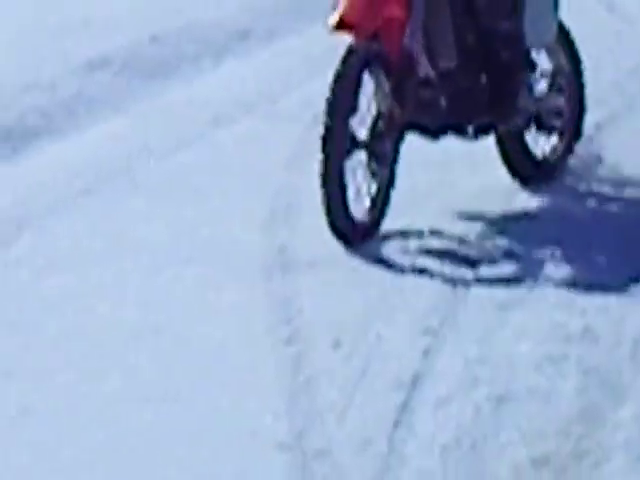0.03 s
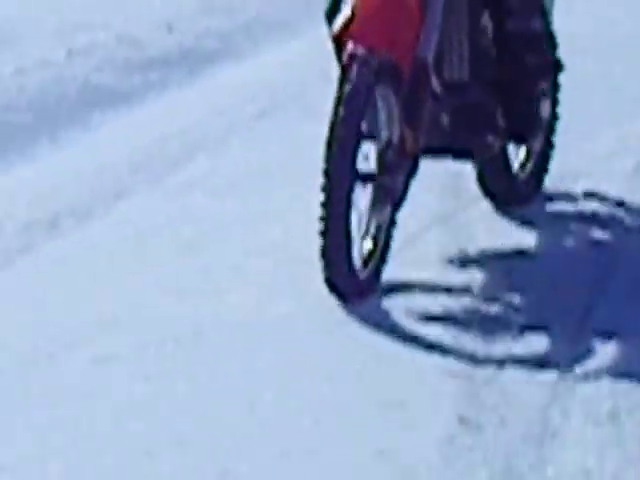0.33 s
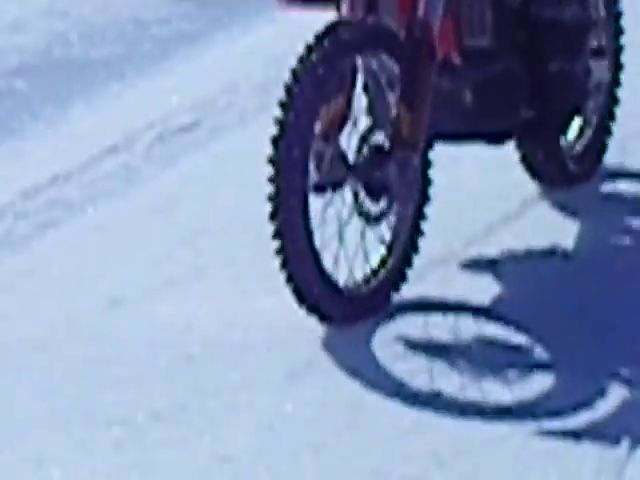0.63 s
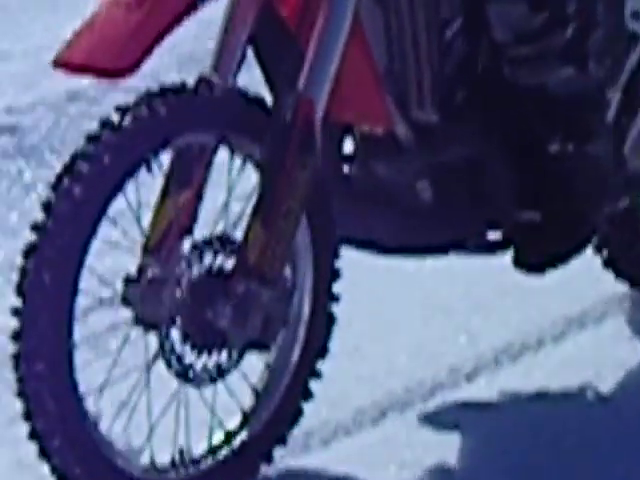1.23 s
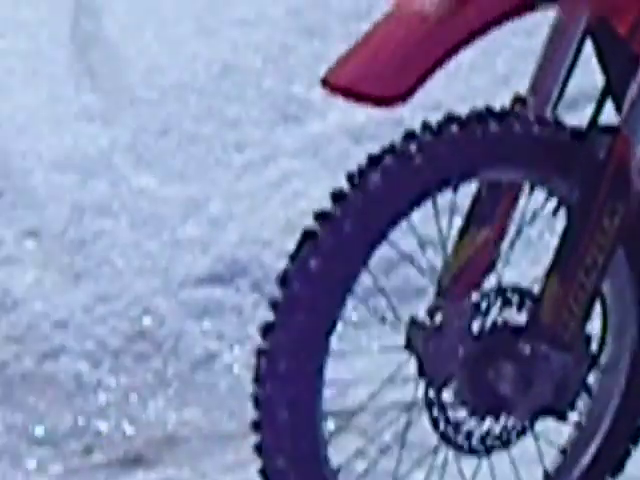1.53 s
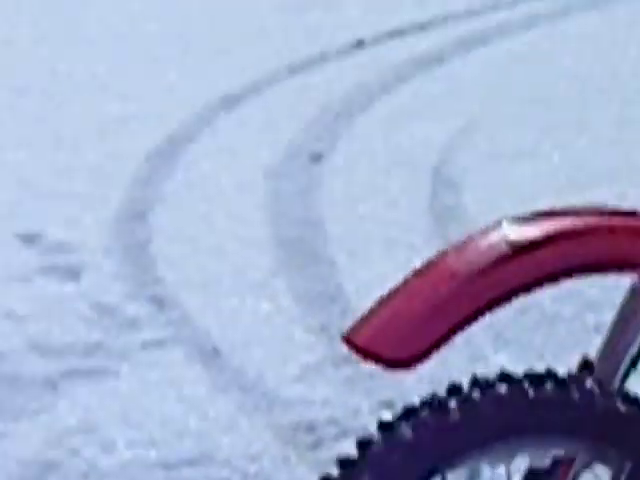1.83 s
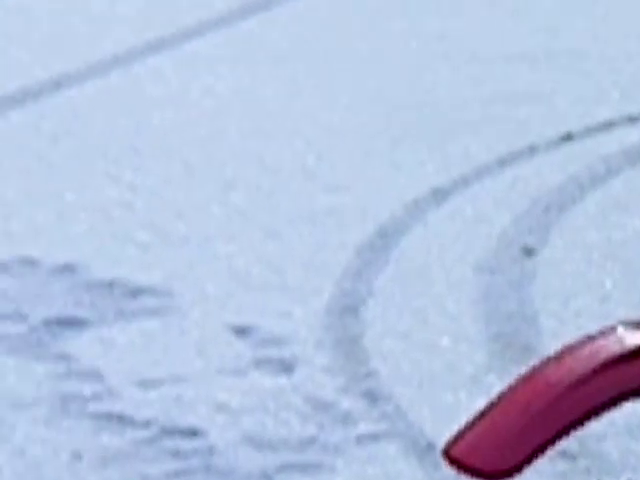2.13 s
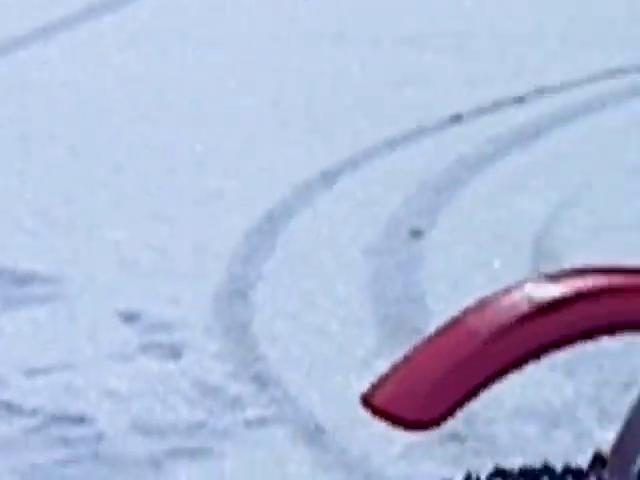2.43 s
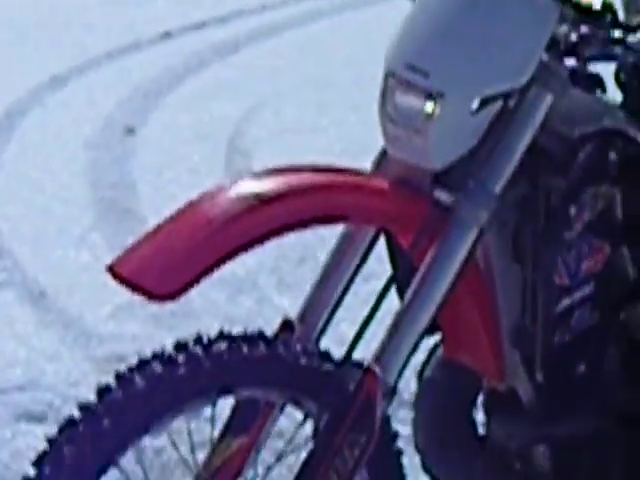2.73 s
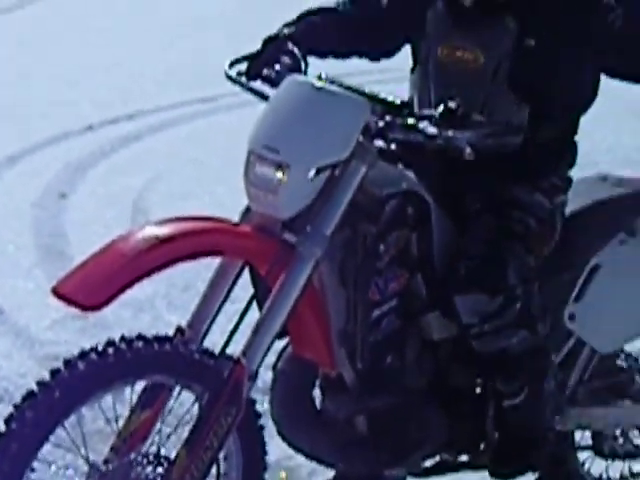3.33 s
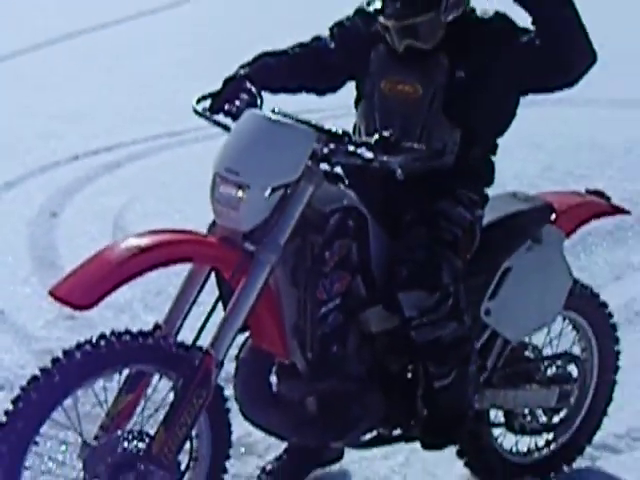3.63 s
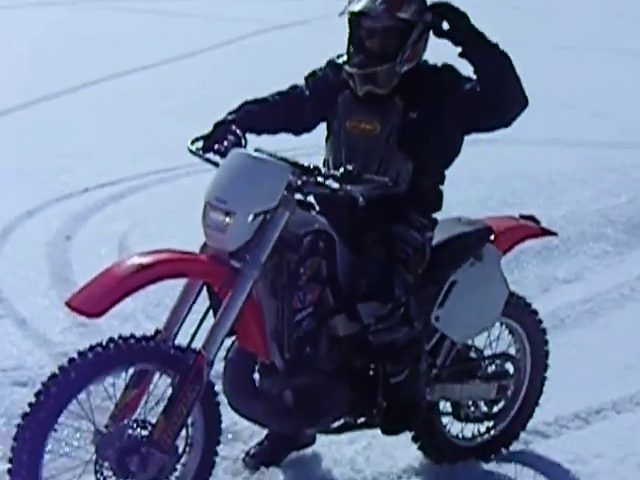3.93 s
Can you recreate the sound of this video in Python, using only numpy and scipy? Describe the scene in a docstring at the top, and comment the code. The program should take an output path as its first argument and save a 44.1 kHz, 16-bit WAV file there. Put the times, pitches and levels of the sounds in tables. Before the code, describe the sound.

A two-stroke dirt bike coasts up with a rasping putter, passes close to the microphone and idles. Sharp, irregular pops ring metallically from its exhaust throughout, over a rattle and a low drone, in the open air.

```python
"""The puffing and sharp pops of a two-stroke dirt bike, which coasts up, passes close by and idles.
Its single cylinder puffs through the exhaust on every turn of the crank but fires hard only now and then.
Each hard firing cracks, rings the steel expansion chamber (the bulge in the exhaust pipe) and kicks
the crank, which then slows again. Gas rasps and metal rattles over a low drone and faint outdoor air."""
import sys
import numpy as np
from scipy import signal
from scipy.io import wavfile
from scipy.ndimage import uniform_filter1d

SR = 44100
rng = np.random.default_rng(int(sys.argv[2]) if len(sys.argv) > 2 else 0)


def put_to_file(sound):
    """Save the sound as 16-bit audio at rate SR, in the file named by the first command-line argument."""
    columns = np.atleast_2d(sound).T  # one column per channel
    safe = np.clip(columns, -1, 1)
    whole_steps = np.round(safe * 32767)
    wavfile.write(sys.argv[1], SR, whole_steps.astype(np.int16))


N = 176400
T = np.arange(N) / SR

# how fast the crank spins before kicks are added (time [s], speed [turns/s])
CRANK_SPEED = [(0,40),(.11,46.6),(.15,51),(.25,50.6),(.36,49.4),(.47,47.7),(.6,47),(.8,43.7),(.95,41.6),(1.1,41.2),(1.35,40.6),(1.52,36),(1.7,42.4),(1.95,43.8),(2.14,42),(2.3,42.3),(2.45,35.5),(2.66,40.5),(2.95,43.8),(3.12,40.3),(3.3,39),(3.48,37),(3.68,35.2),(4,36)]
# hard firings (time [s], relative ring [dB], relative crack [dB], relative thump [dB], kick [turns/s])
HARD_FIRINGS = [(.120,-7.5,-11,-11,9.9),(0.29,-17.5,-20.5,-37,1.4),(0.483,-11,-16.5,-7,3),(0.63,-20.5,-20,-21,1),(.878,-12,-15,-11.5,1),(0.994,-8,-14.5,-50,2.3),
                (1.159,-10,-15.5,-11,0.61),(1.400,-6.5,-12.5,-14,0.97),(1.502,-11.5,-16,-15,2.5),(1.547,2.5,-10.5,-8.5,10),(1.631,0,-9.5,-13,7),(1.801,-14.5,-12.5,-19.5,2.2),(1.982,1.5,-10.5,-8,7),
                (2.174,-11,-23.5,-36,0.82),(2.224,-15.5,-16,-15,0.94),(2.272,-31,-27,-15,0.17),(2.320,1,-13,-6,8.9),(2.472,-2.5,-14.5,-14,5.5),(2.522,-13.5,-19.5,-27,5.5),
                (2.755,-14,-16,-18,1.4),(2.805,-16.5,-23,-19,1.3),(2.854,-27,-33,-18,0.76),(2.952,-20,-20.5,-12.5,0.34),(2.997,-4.5,-13,-17,3.5),(3.097,-27.5,-21.5,-13.5,0.12),(3.145,-2.5,-14,-20,3),(3.197,-18,-15.5,-13.5,3.4),
                (3.321,-4.5,-14.5,-14,9),(3.498,-6.5,-12.5,-18,8.9),(3.702,1,-10.5,-14,8),(3.834,1.5,-12,-14,5.9),(3.966,-6.5,-14.5,-26,5.3)]
# relative levels between firings (time [s], puffs [dB], rasp [dB], rattle [dB])
ENGINE_LEVELS = [(0, -24, -23, -24), (0.1, -18, -21, -25), (0.19, -35, -28, -32), (0.27, -25, -25, -26),
                 (0.4, -20.5, -22, -30), (0.55, -23.5, -23.5, -29.5), (0.63, -22, -21.5, -26),
                 (0.85, -23, -20.5, -24), (1.1, -23, -21.5, -26.5), (1.36, -22.5, -18, -20),
                 (1.46, -28.5, -21.5, -24.5), (1.6, -29, -14, -24), (1.68, -29, -21.5, -28.5),
                 (1.78, -24.5, -20.5, -22.5), (1.95, -20, -18, -22), (2.03, -32.5, -23, -26.5),
                 (2.16, -20, -21.5, -22), (2.29, -23, -22.5, -23.5), (2.37, -35, -19, -24),
                 (2.45, -25, -22.5, -25), (2.58, -34.5, -30, -33), (2.68, -21.5, -21.5, -24.5),
                 (2.96, -24, -20.5, -25), (3.05, -28.5, -25, -27.5), (3.24, -25, -19.5, -23),
                 (3.37, -39, -27, -29), (3.47, -31.5, -22.5, -27.5), (3.56, -47, -28, -33.5),
                 (3.67, -30, -23.5, -25.5), (3.77, -32, -22, -26.5), (4, -31, -25, -28)]
# exhaust tone as the bike rolls past (time [s], boom pitch [Hz], boom width [Hz], puff pitch [Hz])
EXHAUST_TONE = [(0,328,49.7,290),(.15,326,86.6,276),(.27,360,35,310),(.48,337,24.4,292),(.65,338,47,286),(.85,333,55.6,262),(1.1,324,33.3,250),(1.5,268,60.8,216),(1.72,375,39.9,406),(1.95,358,58.8,395),(2.15,321,24.5,379),(2.7,331.5,27.2,392),(3,315.5,22.2,395),(4,339,53.7,390)]
# loudness of the low drone (time [s], level [dB])
DRONE_LEVEL = [(0,-30.5),(.3,-36.5),(.7,-32),(1.1,-33.5),(1.5,-30.5),(1.7,-33.5),(2.5,-40),(3.2,-37),(4,-35)]
# how much bass and treble each sound has (frequency [Hz], relative level [dB])
DRONE_SPECTRUM = [(20,-32),(60,-18.5),(85,-5.5),(105,3.5),(135,5),(165,-1.5),(210,8),(270,-3.5),(450,-30),(2000,-93.5)]
RATTLE_SPECTRUM = [(20,-54),(1200,-24.5),(2200,-11.5),(2800,-2),(3600,-7.5),(4300,-4.5),(5200,-6),(6000,-22)]
RASP_SPECTRUM = [(20,-52),(200,-15.5),(420,1.5),(600,0),(820,0.5),(1000,-2),(1260,0),(1600,-1),(2100,0),(2700,-4),(4000,-25),(6000,-39.5)]
BUZZ_SPECTRUM = [(20,-59.5),(250,-11.5),(430,-6),(600,-5.5),(800,1),(1000,-1),(1260,-5),(1600,-6.5),(2400,-15),(6000,-38)]
THUMP_SPECTRUM = [(20,-59.5),(120,-28.5),(220,-0.5),(330,12),(430,2.5),(560,-14),(800,-15.5),(2000,-47),(8000,-81.5)]
RING_SPECTRUM = [(20,-39),(800,-12),(2000,-34),(2600,-11.5),(3300,4),(4300,2),(5200,4.5),(6000,-8)]
CRACK_SPECTRUM = [(20,-27),(200,-28.5),(500,9.5),(800,8),(1300,4),(2000,3),(2800,6),(6000,-22)]
# ringing notes of the steel chamber (frequency [Hz], relative level [dB], time to fade by 60 dB [s])
STEEL_NOTES = [(2218,-10,.1),(2608,-3,.17),(2835,-3,.15),(3078,0,.11),(3402,-2,.08),(3541,-2,.13),(4012,-6,.07),(4585,-7,.06)]
# notes of the gas in the pipe (frequency [Hz], width [Hz], relative level [dB])
PIPE_NOTES = [(635,14,-1.5),(754.3,15,5),(783,40,1.5),(896,41,4.5),(1036,56,-4.5),(1249,28,1.5)]

EXHAUST_LAG_S, PIPE_ECHO_S = .005, .00865
PUFF_SPREAD_DB, BUZZ_SPREAD_DB = 4.5, 3  # how much one turn differs from the next


def amp(db):
    """Turns decibels into a gain."""
    return 10 ** (np.asarray(db) / 20)


def unit(x):
    """Scales a sound to an average power of 1."""
    return x / np.sqrt(np.mean(x ** 2) + 1e-20)


def curve(table, column=1):
    """One column of a table, joined by straight lines in time."""
    rows = np.array(table, float)
    return np.interp(T, rows[:, 0], rows[:, column])


def delay(x, seconds):
    """Makes a sound later, or earlier if seconds is negative."""
    return np.interp(T - seconds, T, x)


def convolve(x, response):
    """Makes every sample of x set off a copy of the response."""
    return signal.fftconvolve(x, response)[:N]


def colour(x, spectrum, size=4096):
    """Shapes bass and treble with a filter that rings only after each sound."""
    hz, db = np.transpose(spectrum)
    bin_hz = abs(np.fft.fftfreq(size, 1 / SR))
    log_gain = np.log(amp(np.interp(np.log(bin_hz + 1), np.log(hz), db)))
    response = np.fft.ifft(np.exp(np.conj(signal.hilbert(log_gain)))).real[:size // 2]
    return convolve(x, response / np.linalg.norm(response))


def resonate(x, hz, width):
    """Rings at a pitch that may move; a narrower width rings longer."""
    spin = np.exp(2j * np.pi * np.cumsum(hz * np.ones(N)) / SR)
    decay = np.exp(-np.pi * width * np.ones(N) / SR)
    shifted, state = x / spin, np.zeros(1, complex)
    for part in np.array_split(np.arange(N), 100):
        kept = decay[part[0]]
        shifted[part], state = signal.lfilter([1 - kept], [1, -kept], shifted[part], zi=state)
    return 2 * (spin * shifted).real


def burst(start, rise, hold, fall):
    """Rises to 1, then dies away from `hold` seconds after the start."""
    t = T - start
    return np.clip(t / rise, 0, 1) * np.exp(-np.clip((t - hold) / fall, 0, 50))


def crank():
    """Counts the turns of the crank; the exhaust port opens at each whole number."""
    speed = curve(CRANK_SPEED)
    for start, *_, kick in HARD_FIRINGS:
        speed += kick * burst(start, rise=.0065, hold=.008, fall=.085)
    turns = np.cumsum(speed) / SR
    # near idle, after 1.1 s, nudge the turns into step with the firings
    openings = np.array([start for start, *_ in HARD_FIRINGS if start > 1.1]) + EXHAUST_LAG_S
    slip = np.unwrap(np.interp(openings, T, turns) % 1, period=1)
    return turns - np.interp(T, openings, slip)


def strokes(turns, spread_db):
    """One click of uneven size per turn."""
    clicks = np.diff(np.floor(turns), prepend=np.floor(turns[0]))
    return clicks * amp(spread_db * rng.uniform(-1.1, 1, N))


def pulsing_noise(turns, depth, phase):
    """Noise that swells once per turn."""
    return rng.standard_normal(N) * np.exp(depth * np.cos(2 * np.pi * (turns + phase)))


def air():
    """The faint, steady hush of the outdoors."""
    return amp(-53) * colour(rng.standard_normal(N), [(20, 5), (120, 0), (1000, -2.5), (6000, -23)])


def drone(turns):
    """The exhaust hums low, pushed once per turn."""
    pushes = unit(strokes(turns + .4, PUFF_SPREAD_DB)) + .5 * rng.standard_normal(N)
    return unit(colour(pushes, DRONE_SPECTRUM)) * curve_gain(DRONE_LEVEL)


def curve_gain(table, column=1):
    """A table's decibel column as a changing gain."""
    return amp(curve(table, column))


def chamber(x, crowd_fade_s=.11):
    """The steel chamber rings with a few strong notes and a crowd of weaker ones."""
    t = T[:SR // 2]
    strong = sum(amp(db - 60 * t / fade_s) * np.sin(2 * np.pi * (hz * t + rng.random()))
                 for hz, db, fade_s in STEEL_NOTES)
    crowd = colour(rng.standard_normal(N), RING_SPECTRUM)[:len(t)] * amp(-60 * t / crowd_fade_s)
    ring = unit(strong) + unit(crowd)
    return convolve(x, ring / np.linalg.norm(ring))


def rattle(turns, grain_db=2.5):
    """Piston and gears clatter in time with the crank and keep the chamber ringing."""
    grain = amp(grain_db * unit(uniform_filter1d(rng.standard_normal(N), size=70)))
    clatter = unit(grain * pulsing_noise(turns, depth=.17, phase=.18))
    clatter *= curve_gain(ENGINE_LEVELS, column=3)
    return amp(-2.5) * colour(clatter, RATTLE_SPECTRUM) + amp(-7.5) * chamber(clatter)


def lull(db_per_kick=-.7):
    """The rasp dips after a firing; a harder kick makes a deeper dip."""
    kicks = sum(kick * burst(start + .0076, rise=.0078, hold=.029, fall=.02)
                for start, *_, kick in HARD_FIRINGS)
    return amp(db_per_kick * kicks)


def rasp(turns, spurt_fade_s=.017, buzz_lead_s=.008):
    """Gas rushes through the ports: it buzzes, hisses as it swirls, and sounds the pipe's notes."""
    t = T[:SR // 20]
    spurt = rng.standard_normal(len(t)) * np.exp(-t / spurt_fade_s)
    spurts = convolve(strokes(turns, BUZZ_SPREAD_DB), spurt)
    buzz = unit(colour(delay(spurts, -buzz_lead_s), BUZZ_SPECTRUM))
    swirl = unit(pulsing_noise(turns, depth=.34, phase=.47))
    pushes = unit(strokes(turns, BUZZ_SPREAD_DB)) + .25 * swirl
    pipe = unit(sum(amp(db) * resonate(pushes, hz, width) for hz, width, db in PIPE_NOTES))
    gas = unit(colour(swirl, RASP_SPECTRUM) + amp(-1.5) * buzz + amp(-2.5) * pipe)
    return gas * curve_gain(ENGINE_LEVELS, column=2) * lull()


def silencer(x):
    """The silencer booms at one low note, which shifts as the bike rolls past."""
    return resonate(x, hz=curve(EXHAUST_TONE), width=curve(EXHAUST_TONE, column=2))


def exhaust(turns, puff_width_hz=170):
    """One puff per turn booms in the silencer and echoes along the pipe."""
    puff_hz = curve(EXHAUST_TONE, column=3)
    puffs = strokes(turns, PUFF_SPREAD_DB)
    for _ in range(2):  # soften the clicks into puffs
        puffs = resonate(puffs, puff_hz, puff_width_hz)
    puffs = unit(signal.sosfilt(signal.butter(2, 170, "high", fs=SR, output="sos"), puffs))
    boom = silencer(puffs)
    boom /= np.sqrt(uniform_filter1d(boom ** 2, size=4000) + 1e-9)  # even out its loudness
    echoing = puffs + .24 * delay(puffs, PIPE_ECHO_S)
    return unit(boom + amp(-3.5) * echoing) * curve_gain(ENGINE_LEVELS)


def thumps(boost_db=17.5):
    """Each hard firing thumps out of the exhaust, and the silencer booms just after."""
    clicks = np.zeros(N)
    for start, _, _, thump_db, _ in HARD_FIRINGS:
        clicks[round((start + EXHAUST_LAG_S) * SR)] = amp(thump_db + boost_db)
    thuds = colour(clicks, THUMP_SPECTRUM)
    return thuds + 1.15 * delay(silencer(thuds), PIPE_ECHO_S)


def pops():
    """Each hard firing cracks in the pipe and sets the steel chamber ringing."""
    crack_gain, ring_gain = np.zeros(N), np.zeros(N)
    for start, ring_db, crack_db, *_ in HARD_FIRINGS:
        crack_gain += amp(crack_db) * burst(start, rise=.0016, hold=.0073, fall=.0057)
        for fall in (.0052, .024):  # a quick hit and a longer tail
            ring_gain += amp(ring_db) * burst(start, rise=.0078, hold=.013, fall=fall)
    shock = ring_gain * rng.standard_normal(N)
    crack = colour(crack_gain * rng.standard_normal(N), CRACK_SPECTRUM)
    return crack + amp(-10) * colour(shock, RING_SPECTRUM) + amp(-18) * chamber(shock)


def scene():
    """The engine in the open air, in one channel."""
    turns = crank()
    engine = drone(turns) + rattle(turns) + rasp(turns) + exhaust(turns) + thumps() + pops()
    return (air() + engine)[None]


def record(dry, limit_db=-10.5, recover_db_per_s=75, ceiling=.76, edge_hz=5950, top_hz=15800):
    """A limiter turns the sound down after loud pops; high treble is cut and tall peaks are rounded."""
    power_db = 10 * np.log10(abs(uniform_filter1d(dry[0] ** 2, size=130)) + 1e-12)
    recovery = T * recover_db_per_s
    held_db = np.maximum.accumulate(power_db + recovery) - recovery
    over_db = np.maximum(held_db - limit_db, 0)
    ducked = dry / amp(signal.lfilter([1 / 90], [1, 1 / 90 - 1], over_db))  # reacts in about 2 ms
    treble_cut = signal.firwin(201, edge_hz, window=("kaiser", 8), fs=SR)
    dulled = signal.oaconvolve(ducked, treble_cut[None], "same")
    rounded = dulled / (1 + (dulled / ceiling) ** 20) ** (1 / 20)
    top_cut = signal.firwin(511, top_hz, window=("kaiser", 9), fs=SR)
    return signal.oaconvolve(rounded, top_cut[None], "same")


dry = scene()
out = record(dry)
put_to_file(out)
```